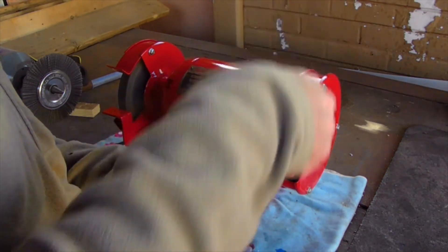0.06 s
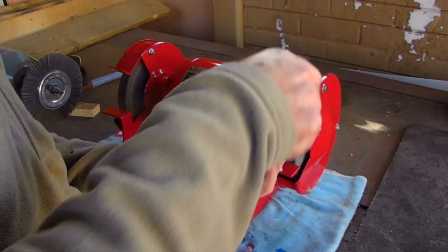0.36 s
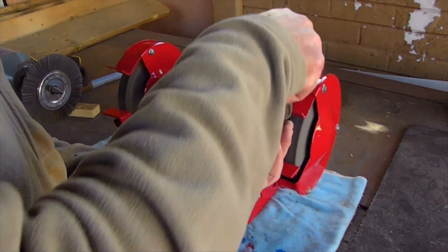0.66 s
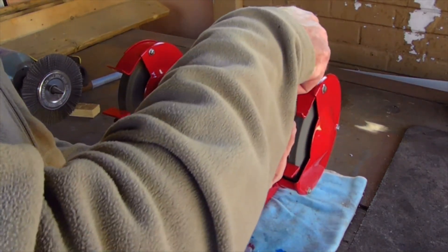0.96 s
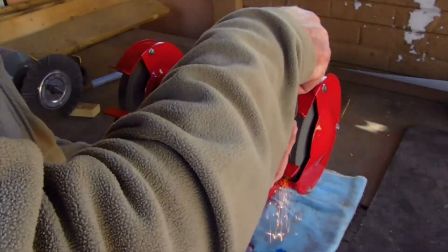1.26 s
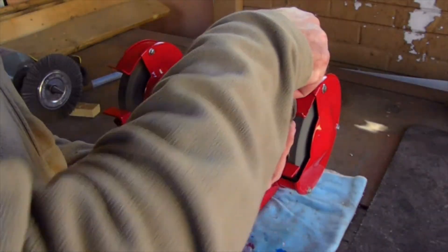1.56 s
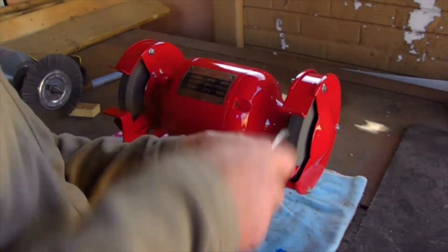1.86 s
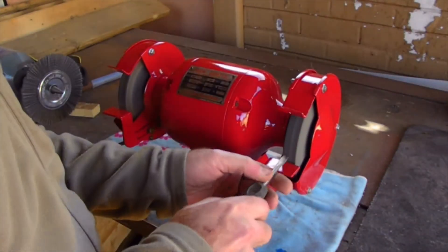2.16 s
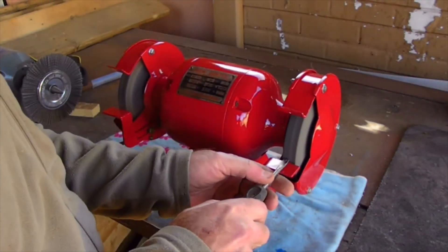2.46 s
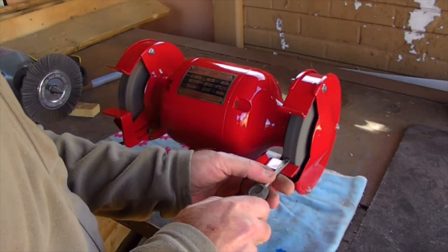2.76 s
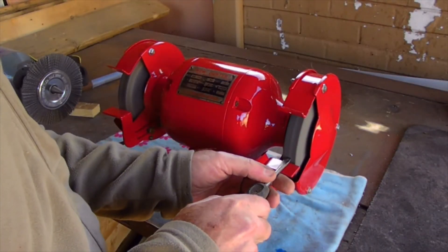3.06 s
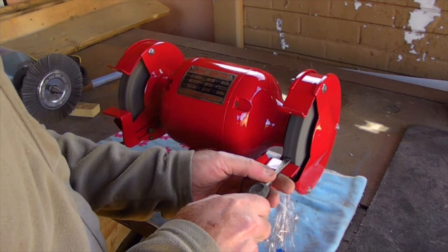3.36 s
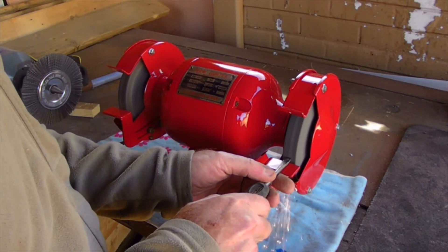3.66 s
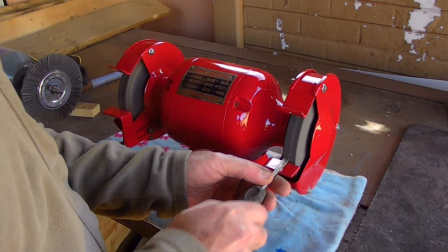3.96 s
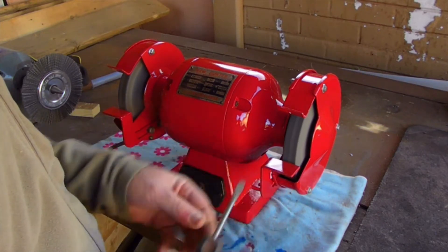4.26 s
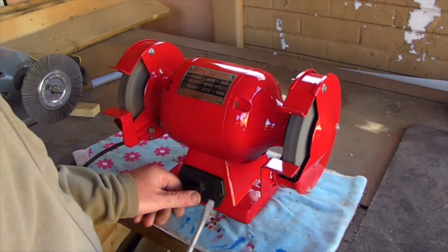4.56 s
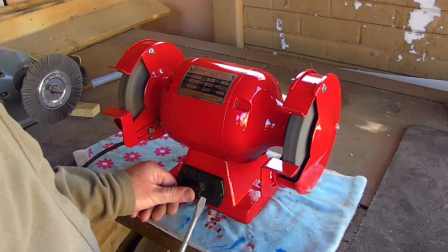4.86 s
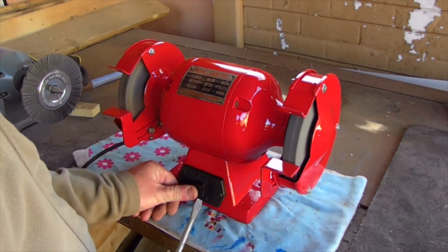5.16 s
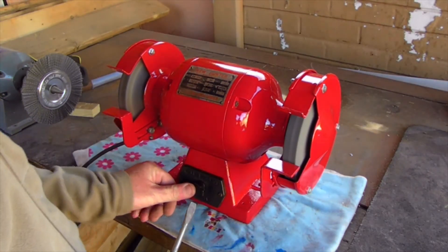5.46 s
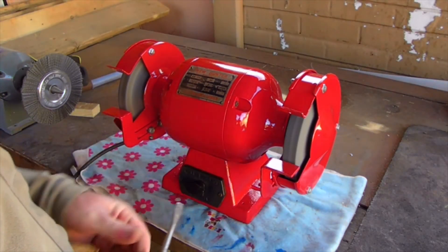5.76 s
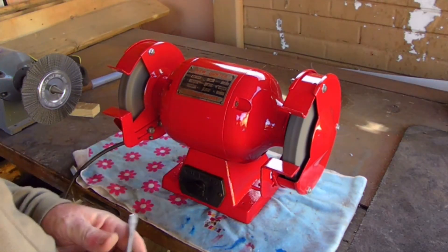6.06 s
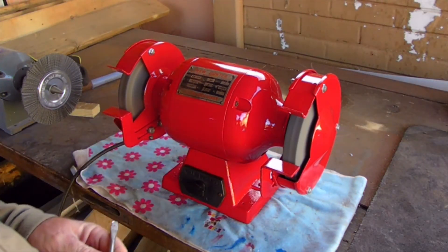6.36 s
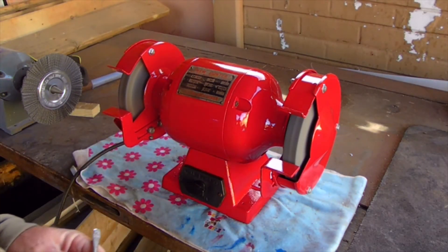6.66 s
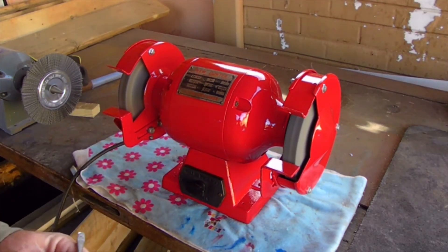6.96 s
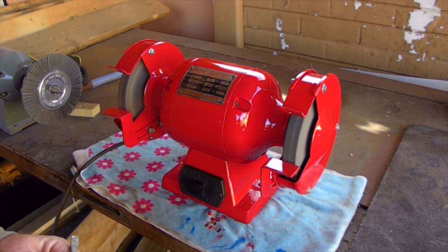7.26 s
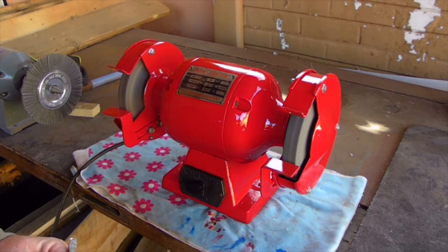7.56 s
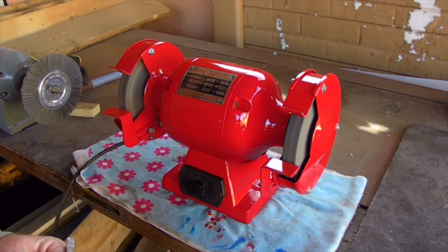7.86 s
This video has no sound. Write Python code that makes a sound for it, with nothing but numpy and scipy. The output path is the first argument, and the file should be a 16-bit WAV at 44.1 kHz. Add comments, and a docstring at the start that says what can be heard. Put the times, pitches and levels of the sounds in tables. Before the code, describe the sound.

A bench grinder is already running in a small shed, with a steady, high bearing whine and a gently swelling whistle over the hiss of its wheels. From about 1.1 to 1.6 seconds a screwdriver tip is pressed to the wheel, making a louder, smooth, bright rasp with a sizzle of sparks. At about 3.2 and 3.7 seconds come two shorter, lighter passes, each a rapid metallic chatter. The machine runs on alone until a sharp switch snap at 5.2 seconds. The wheels then coast, their tones fluttering, slowly falling in pitch and growing duller. At about 7.2 seconds something hard lands with a single bright clack. The grinder is still winding down at 8 seconds. The sound is mono, with short reverberation, faint low room noise and a slight dip in level after the loud moments.

```python
"""Bench grinder in a shed

A grinder runs on a wooden bench, its ball bearings singing over the hiss of the wheels.
A screwdriver tip is ground: one smooth pass, then two lighter ones that chatter once per wheel turn.
The switch snaps off, the wheels coast down and something hard clacks. Mono, with gain control."""
import sys
import numpy as np
from scipy import signal
from scipy.fft import rfft, irfft, next_fast_len
from scipy.io import wavfile
from scipy.ndimage import uniform_filter1d, minimum_filter1d, map_coordinates

SR = 44100
rng = np.random.default_rng(int(sys.argv[2]) if len(sys.argv) > 2 else 0)


def persist_wave(psi):
    """Save psi, clipped to +-1, as 16-bit WAV."""
    counts = np.round(np.clip(psi, -1, 1) * 32767).astype(np.int16)
    wavfile.write(sys.argv[1], SR, np.atleast_2d(counts).T)


N = 352800
TIME = np.arange(N) / SR
SHAFT_HZ, OFF_S = 48.26, 5.19
PASS_START_S, PASS_END_S = 1.108, 1.585


def amp(db):
    """Decibels to gain."""
    return np.exp(np.asarray(db) * (np.log(10) / 20))


def unit(x):
    """Scaled to rms 1."""
    return x / np.sqrt(np.mean(np.abs(x) ** 2) + 1e-20)


def along(points, hz):
    """(Hz, value) points read on a log axis."""
    knots_hz, values = np.transpose(points)
    return np.interp(np.log(hz + 1), np.log(knots_hz + 1), values)


def noise():
    """White noise."""
    return rng.standard_normal(N)


def wobble(rate_hz):
    """Smooth curve through random knots."""
    knots = rng.standard_normal(400)
    steps = np.arange(0, N, 200)
    return np.interp(TIME, steps / SR, map_coordinates(knots, [steps * rate_hz / SR], mode="wrap"))


def grit(spread_db, rate_hz):
    """Noise in brief grains of uneven level."""
    grain = (TIME * rate_hz).astype(int)
    return unit(noise() * amp(spread_db * rng.standard_normal(grain[-1] + 1))[grain])


def bursts(rows):
    """A decaying noise burst per (time [s], level [dB], t60 [s]) row."""
    level = np.zeros(N)
    for start_s, db, t60_s in rows:
        start = round(start_s * SR)
        t = TIME[:min(N - start, SR // 4)]
        level[start:start + len(t)] += amp(db - 60 * t / t60_s) * (1 - np.exp(-t / 0.00085))
    return level * noise()


def contact(spans, press_s=0.017, lift_s=0.027):
    """1 while the tip is on the wheel, ramped at both ends."""
    ramps = (np.minimum((TIME - start) / press_s, (end - TIME) / lift_s) for start, end in spans)
    return sum(np.clip(ramp, 0, 1) for ramp in ramps)


def filtered(x, response):
    """x through a frequency response."""
    size = next_fast_len(N + SR // 6)
    spectrum = rfft(x.astype(np.float32), size) * response(np.fft.rfftfreq(size, 1 / SR))
    return irfft(spectrum.astype(np.complex64), size)[:N].astype(float)


def coloured(x, spectrum):
    """x through a smooth spectrum, keeping the power of white noise."""
    return filtered(x, lambda hz: unit(amp(along(spectrum, hz))))


def rung(x, modes):
    """x through resonances, keeping the power of white noise; thin steel radiates little bass."""
    def response(hz):
        bank = sum((-1) ** k * amp(db) * 1j * hz * width / (centre ** 2 - hz ** 2 + 1j * hz * width)
                   for k, (centre, width, db) in enumerate(modes))
        return unit(bank * (1j * hz / (1j * hz + 350)) ** 3)
    return filtered(x, response)


# Shed decay (frequency [Hz], t60 [s])
SHED_DECAY = [(200, .26), (2000, .23), (6000, .15), (14000, .1)]


def shed(x):
    """Wall reverberation; the treble dies first."""
    hz, t, spectra = signal.stft(rng.standard_normal(SR // 2), SR, nperseg=256)
    decay = amp(-60 * t / along(SHED_DECAY, hz)[:, None])
    tail = signal.istft(spectra * decay, SR, nperseg=256)[1]
    return signal.fftconvolve(np.pad(x, (150, 0)), tail / np.linalg.norm(tail))[:N]


def shaft_speed(load, sag_hz=.13, inertia_s=0.301, friction_hz_per_s=5.7, drag_per_s=.145):
    """Turns a second: grinding drags the motor a little; once off, friction and air slow it."""
    follow = 1 / (inertia_s * SR)
    driven_hz = SHAFT_HZ - sag_hz * signal.lfilter([follow], [1, follow - 1], load)
    offset_hz = friction_hz_per_s / drag_per_s
    return (driven_hz + offset_hz) * np.exp(-drag_per_s * np.maximum(TIME - OFF_S, 0)) - offset_hz


def bearing(turns, pass_db, sideband_db, outer_db, between_db, uneven_db):
    """13 balls pass over a rough race in three turns; the turning load adds two sidebands each side."""
    size, harmonic = 2 ** 15, np.arange(1350)
    families = [np.isin(harmonic % 13, offsets) for offsets in (0, (3, 10), (6, 7))]
    db = np.select(families, [pass_db, sideband_db, outer_db], between_db)
    db = np.where(harmonic < 60, between_db, db) + uneven_db * rng.standard_normal(len(harmonic))
    race = irfft(amp(db) * np.exp(2j * np.pi * rng.random(len(harmonic))), size)
    return unit(np.interp(turns / 3 % 1 * size, np.arange(size), race))


# Motor partials and ball-pass tones at full speed (frequency [Hz], level [dB])
MOTOR_TONES = [(1044, -61), (1109, -63), (1174, -57), (1206, -55), (1435, -62)]
LOW_BEARING_TONES = [(1674, -58), (1723, -59), (1884, -56), (2089, -55), (2250, -54), (2299, -57),
                     (2347, -57), (2396, -58), (2476, -52), (2509, -46), (2606, -56), (2670, -52),
                     (2719, -50), (2767, -55), (2815, -57), (3090, -56), (3138, -55), (3257, -59),
                     (3295, -57), (3391, -59), (3505, -59), (3601, -60)]
HIGH_BEARING_TONES = [(3811, -54), (3924, -46), (3973, -46), (4070, -49), (4183, -45), (4344, -51),
                      (4393, -47), (4490, -53), (4597, -52), (4694, -53), (4748, -52), (5017, -48),
                      (5227, -51), (5437, -43), (5486, -50), (5550, -51), (5647, -46), (5857, -47),
                      (5970, -53), (6110, -55), (6272, -52), (6320, -51), (6385, -46), (6481, -44),
                      (6519, -49), (6578, -48), (6691, -52), (6901, -50), (6998, -51), (7106, -56),
                      (7230, -56), (9990, -60), (12930, -60), (13700, -60)]


def whine(turns, coasting, waver_db=.7, swell_db=3.2, fade_db=-3.5):
    """Tones locked to the shaft; weaker and more unsteady as it coasts."""
    gains = [amp(wobble(8) * (waver_db + swell_db * coasting) + fade_db * coasting) for _ in range(7)]
    tones = np.zeros(N)
    for k, (hz, db) in enumerate(MOTOR_TONES + LOW_BEARING_TONES + HIGH_BEARING_TONES):
        cycles = hz / SHAFT_HZ * turns + rng.random()
        tones += amp(db) * gains[k % len(gains)] * np.sin(2 * np.pi * cycles)
    return np.sqrt(2) * tones


def slot_tone(turns, slots=27, fade_db_per_s=1, beat_db=4, beat_s=1.793):
    """The rotor's slots whistle, slowly swelling and sinking."""
    db = -43 - fade_db_per_s * TIME + beat_db * np.cos(2 * np.pi * (TIME - 0.26) / beat_s)
    return amp(db) * np.sin(2 * np.pi * slots * turns)


def speed_balance(x, pace, edges_hz=(3200, 7900)):
    """Three bands follow the shaft speed; the treble fades fastest."""
    low, low_mid = (filtered(x, lambda hz: 1 / (1 + (hz / edge) ** 8)) for edge in edges_hz)
    return (amp(1) * pace ** .55 * low
            + amp(0.54) * pace ** .95 * (low_mid - low)
            + amp(8.5) * pace ** 1.5 * (x - low_mid))


# Motor shell, wheel guards, bearing rings (frequency [Hz], width [Hz], gain [dB])
HOUSING_MODES = [(3976, 64, 2.5), (4190, 25, 6), (4480, 170, -4), (5020, 150, 6.5), (5505, 90, 3),
                 (5750, 38, 6.5), (5930, 81, 1), (6490, 37, 4.5), (6583, 140, -0.5)]
GUARD_MODES = [(1091, 56, -1.5), (1254, 89, 1.5), (1500, 30, -10), (1629, 44, -1.5), (1731, 32, -4.5),
               (1921, 27.5, 7), (2058, 51, -1.5), (2262, 48, 3), (2500, 52, -1.5), (2703, 37, 2),
               (3260, 28, -8)]
RACE_MODES = [(9450, 1000, -1.5), (10200, 87, 0), (11120, 370, 0.5), (12600, 220, 6), (13160, 200, 6.5),
              (14000, 250, -3), (14300, 350, -11)]
# Machine radiation, air round the wheels (frequency [Hz], gain [dB])
BODY_SPECTRUM = [(410, -28.5), (700, -15.5), (982, -10), (1260, -10), (1510, -12.5), (2440, -3.5),
                 (3560, -10), (4060, 7.5), (4800, 1), (6480, 1.5), (7880, -12), (9210, -15.5), (11900, -23),
                 (15700, -27)]
WINDAGE_SPECTRUM = [(150, -36), (410, -26), (700, -10), (1000, -11), (1250, -5), (1500, -10), (2400, -3.5),
                    (2950, -8), (3650, -3), (4060, 2), (4900, -1), (6450, 0), (7880, -17), (9200, -12),
                    (12000, -21), (15700, -23)]
# An arm shades the machine, then moves away (time [s], gain [dB])
ARM_SHADE = [(0, -1), (1.6, -2.5), (2, -0.5)]


def grinder():
    """Bearing jolts and wheel hiss sound through the housing; the rotor whistles while powered."""
    load = contact([(PASS_START_S, PASS_END_S)] + LIGHT_PASSES)
    speed_hz = shaft_speed(load)
    turns, pace = np.cumsum(speed_hz) / SR, speed_hz / SHAFT_HZ
    coasting = np.clip((TIME - OFF_S) / .06, 0, 1)
    powered = 1 - coasting
    rolling = turns + 0.0003 * wobble(27)  # ball slip
    jolts = powered * bearing(rolling, pass_db=7, sideband_db=7, outer_db=6, between_db=0, uneven_db=0)
    hiss = grit(spread_db=2.5, rate_hz=1300)
    housing = amp(-43.5) * rung(jolts + (.35 + .35 * coasting) * hiss, HOUSING_MODES)
    guards = amp(-51) * coasting * rung(hiss, GUARD_MODES)
    rattle = amp(-36) * coloured(jolts, BODY_SPECTRUM)
    races = amp(-51) * rung(0.72 * jolts + (0.62 + 0.21 * coasting) * hiss, RACE_MODES)
    tones = amp(.7) * pace ** 8 * whine(rolling, coasting)
    air = amp(.5 * coasting - 39.5) * coloured(hiss, WINDAGE_SPECTRUM)
    sound = shed(rattle + housing + guards) + races + tones + air + coasting * run_down(turns, pace)
    # steel on the wheel damps one band of its ring
    sound -= 0.85 * load * filtered(sound, lambda hz: np.exp(-((hz - 2670) / 910) ** 2))
    arm_db = np.interp(TIME, *np.transpose(ARM_SHADE))
    return amp(arm_db) * speed_balance(sound, pace) + powered * slot_tone(turns)


# Room noise (frequency [Hz], gain [dB])
ROOM_SPECTRUM = [(15, -45), (25, -17.5), (136, -12), (192, -25), (275, -5.5), (361, -7), (583, -8),
                 (637, 2.5), (835, -8), (900, -45), (1170, -61), (1980, -120)]
# Swells of a hollow note (time [s], level [dB], half-width [s])
NOTE_SWELLS = [(.74, -57, .05), (2.24, -58, .05), (2.82, -54, .06), (4.32, -55, .05), (4.95, -57, .2),
               (5.86, -53, .07), (6.81, -54, .05), (7.34, -53, .05), (7.8, -53, .12)]


def background():
    """Low room noise that eases as the bench rumbles less, with a faint hollow note now and then."""
    swell = sum(amp(db) * np.exp(-((TIME - s) / width_s) ** 2) for s, db, width_s in NOTE_SWELLS)
    note = coloured(noise(), [(560, -37), (740, 4.5), (880, 8.5), (1080, -69)])
    room_db = np.interp(TIME, [OFF_S, 8], [-58, -67])
    return amp(room_db) * coloured(noise(), ROOM_SPECTRUM) + amp(5) * swell * note


# Grit on steel, sizzle of torn steel (frequency [Hz], gain [dB])
RASP_SPECTRUM = [(530, -44), (900, -35), (1090, -23), (1370, -33), (1820, -39), (2100, -4), (2460, 3.5),
                 (3440, -12.5), (4060, -3), (5160, -3), (6100, 5.5), (7130, 0), (7750, -13), (10100, -1.5),
                 (15700, -23)]
SPARK_SPECTRUM = [(4000, -27), (8500, 1), (12000, -13), (15700, -11)]
# Firmly held blade (frequency [Hz], width [Hz], gain [dB])
BLADE_MODES = [(1103, 52, -9), (2400, 59, -0.5), (5880, 160, -5.5), (6270, 220, 2.5), (6940, 57, -11),
               (10400, 61, -4.5), (11120, 34, -12)]


def smooth_pass(bite_db=1, settle_s=0.17):
    """Grit tears at the tip, hardest at first, rings the blade and throws sizzling sparks."""
    settling = np.exp(-np.maximum(TIME - PASS_START_S, 0) / settle_s)
    unsteady_db = .8 * wobble(25) + 1.3 * wobble(170)
    pressure = contact([(PASS_START_S, PASS_END_S)]) * amp(-30.7 + bite_db * settling + unsteady_db)
    force = pressure * grit(spread_db=2, rate_hz=1000)
    sizzle = pressure * grit(spread_db=6, rate_hz=2500)
    steel = coloured(force, RASP_SPECTRUM) + rung(force, BLADE_MODES)
    return amp(4) * steel + amp(-8) * coloured(sizzle, SPARK_SPECTRUM)


# Tip resting on the wheel (start [s], end [s])
LIGHT_PASSES = [(3.229, 3.48), (3.684, 3.86)]
# High-spot strikes (time [s], level [dB])
WHEEL_BITES = [(3.229, -6), (3.2493, -5.5), (3.268, -4), (3.2917, -5), (3.3107, -6), (3.3313, -8.5),
               (3.354, -6.5), (3.3727, -5.5), (3.3952, -7), (3.414, -6), (3.4364, -7.5), (3.4553, -8),
               (3.4774, -8.5), (3.6836, -6), (3.7042, -4), (3.7244, -5), (3.7446, -4), (3.767, -6.5),
               (3.786, -12), (3.806, -6), (3.828, -13), (3.8494, -6)]
# Scraping tip (frequency [Hz], gain [dB])
SCRAPE_SPECTRUM = [(1060, -25.5), (1800, -6.5), (2410, -6.5), (3000, -8), (3620, -5), (3920, -11),
                   (6340, 3), (7810, -4), (9500, -3), (11500, -11), (15700, -4)]
# Lightly held shank, tool rest (frequency [Hz], width [Hz], gain [dB])
SHANK_MODES = [(2065, 14, 1), (3710, 40, -5), (4190, 80, -5), (4770, 56, 1), (5560, 58, -3), (6210, 70, 0),
               (6450, 120, -3), (6960, 70, -2), (8430, 50, 2), (9650, 60, -6), (9930, 45, -5),
               (12250, 60, -9), (12720, 44, -9)]
REST_MODES = [(654, 29.5, 4), (709, 41, 1), (1130, 81, -5.5)]


def chatter(scrape_t60_s=.055, kick_t60_s=.03):
    """Once a turn the wheel's high spot bites; in between, the tip rubs and shank and rest ring on."""
    t60s = scrape_t60_s * np.exp(.2 * rng.standard_normal(len(WHEEL_BITES)))
    scrapes = bursts([(s, db, t60) for (s, db), t60 in zip(WHEEL_BITES, t60s)])
    scrapes *= amp(2.5 * wobble(310) - .7)  # grit tears unevenly
    rubbing = amp(-26) * contact(LIGHT_PASSES) * grit(spread_db=4, rate_hz=1500)
    kicks = bursts([(s, db, kick_t60_s) for s, db in WHEEL_BITES])
    shank = amp(-6.5) * rung(kicks + rubbing / 2, SHANK_MODES)
    rest = amp(-18.5) * rung(kicks + rubbing, REST_MODES)
    return amp(-11.5) * coloured(scrapes + rubbing, SCRAPE_SPECTRUM) + shank + rest


# Rocker, then contacts (time [s], level [dB], t60 [s])
SWITCH_HITS = [(5.1688, 7.5, 0.017), (5.1710, 6.5, 0.0051)]
# Switch ring (frequency [Hz], width [Hz], gain [dB])
ROCKER_MODES = [(6300, 390, 8), (7000, 120, -12), (13300, 440, -7)]
# Hard impact (frequency [Hz], gain [dB])
CLICK_SPECTRUM = [(30, -32), (200, -8.5), (1200, 1.5), (3000, 3), (6100, 19.5), (9000, 5.5), (15700, 7)]


def switch():
    """The rocker snaps drily and thumps the base."""
    snap = bursts(SWITCH_HITS)
    push = bursts([(5.169, -35, 0.028)])
    thump = coloured(push, [(20, 1), (70, 1), (150, -15), (400, -45), (900, -95)])
    return coloured(snap, CLICK_SPECTRUM) + amp(-14) * rung(snap, ROCKER_MODES) + thump


# Colour of the falling tones (frequency [Hz], gain [dB])
COAST_SPECTRUM = [(550, -14), (780, -3), (1000, -9.5), (1450, -4), (2100, 4), (3200, -1.5), (4200, 6.5),
                  (4800, -3), (5600, 11), (6100, -1.5), (6500, 7.5), (7200, -5), (10000, -16)]


def run_down(turns, pace):
    """Unloaded balls skid; their falling tones flutter in the shed and flare as they cross the modes."""
    skidding = turns + .0009 * wobble(14)
    race = bearing(skidding, pass_db=17, sideband_db=10, outer_db=3, between_db=-14, uneven_db=3.5)
    race *= amp(1.2 * wobble(22) - .2)
    race = .8 * race + .6 * shed(race)
    song = amp(-34) * rung(race, HOUSING_MODES) + amp(-33.5) * coloured(race, COAST_SPECTRUM)
    return amp(-41.5) * rung(race, GUARD_MODES) + pace * song


# Touch, then landing (time [s], level [dB], t60 [s])
CLACK_HITS = [(7.1724, -24, .04), (7.1763, -7, .046)]
# Bright ring, low note (frequency [Hz], width [Hz], gain [dB])
CLACK_MODES = [(1940, 76, -7), (4150, 260, -3), (5450, 200, -1), (6250, 450, 2), (9050, 600, -7)]
HUM_MODES = [(650, 10, 0)]


def clack():
    """A hard object lands, rings briefly and leaves a low note."""
    hits = bursts(CLACK_HITS)
    ring = amp(5) * rung(hits, CLACK_MODES) + amp(-30) * rung(hits, HUM_MODES)
    return coloured(hits, CLICK_SPECTRUM) + ring


def scene():
    """Machine, grinding and clicks in the shed."""
    work = smooth_pass() + chatter()
    clicks = switch() + clack()
    mono = work + amp(-12) * shed(work) + grinder() + clicks + amp(-6.5) * shed(clicks) + background()
    return np.array([mono, mono])


def gain_control(x, threshold_db, range_db, recover_s, start_cut_db):
    """The gain starts low, ducks under loud sounds and creeps back."""
    level_db = 10 * np.log10(np.abs(uniform_filter1d(x ** 2, size=1323, origin=661)) + 1e-12)
    over_db = np.clip(level_db - threshold_db, 0, range_db)
    fading = np.exp(-TIME / recover_s)
    cut_db = fading * np.maximum.accumulate(np.maximum(over_db / fading, start_cut_db))
    return x * amp(-cut_db)


def limiter(x, ceiling_db, hold_s, release_db_per_s):
    """The gain drops at once on a loud snap, holds, then recovers."""
    level_db = 10 * np.log10(np.abs(uniform_filter1d(x ** 2, size=44)) + 1e-12)
    half_hold = int(hold_s * SR / 2)
    over_db = -minimum_filter1d(np.minimum(ceiling_db - level_db, 0), 2 * half_hold + 1, origin=half_hold)
    release_db = release_db_per_s * TIME
    cut_db = np.maximum.accumulate(over_db + release_db) - release_db
    return x * amp(-uniform_filter1d(cut_db, size=22))


def record(dry, notch_hz=7880, top_hz=15850):
    """Mono microphone with a narrow notch, gain control, limiter and band limit."""
    mic = filtered(dry[0], lambda hz: amp(-14 / (1 + ((hz - notch_hz) / 200) ** 2)))
    mic = gain_control(mic, threshold_db=-25.5, range_db=5, recover_s=0.32, start_cut_db=3)
    mic = limiter(mic, ceiling_db=-15, hold_s=.048, release_db_per_s=160)
    mic = filtered(mic, lambda hz: hz < top_hz)
    return np.array([mic, mic])


dry = scene()
out = record(dry)
persist_wave(out)
```